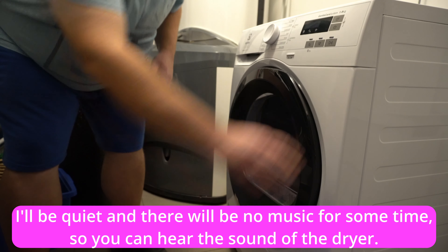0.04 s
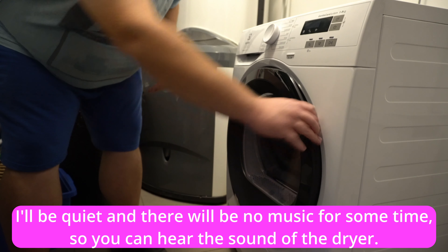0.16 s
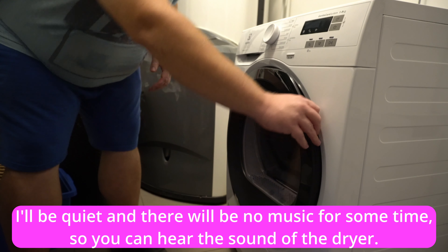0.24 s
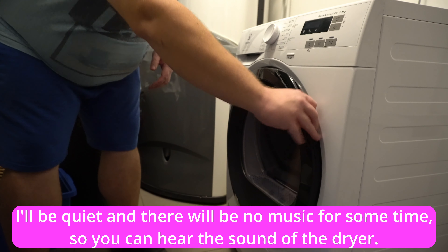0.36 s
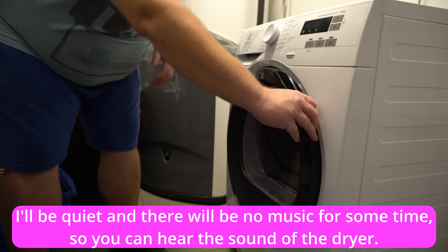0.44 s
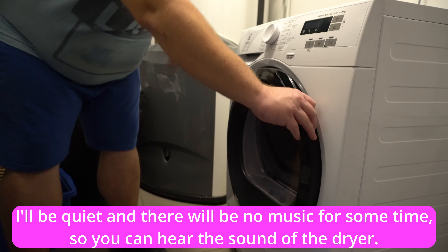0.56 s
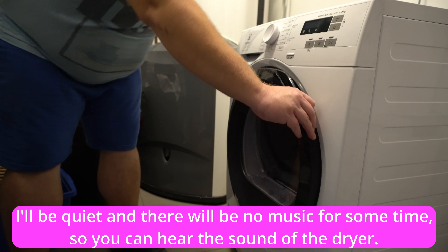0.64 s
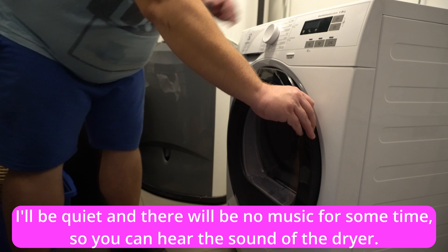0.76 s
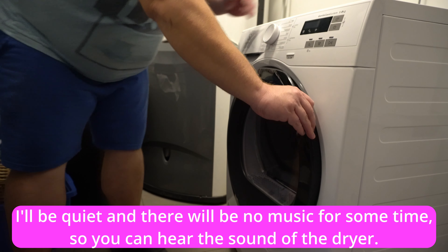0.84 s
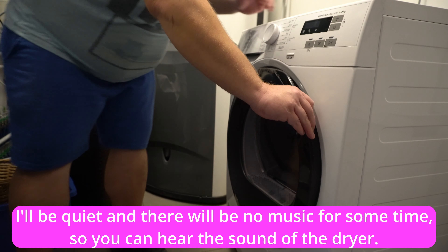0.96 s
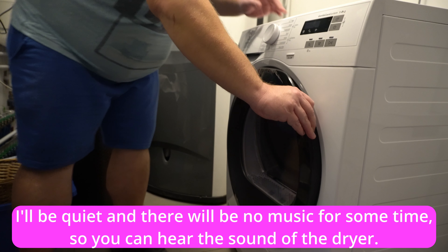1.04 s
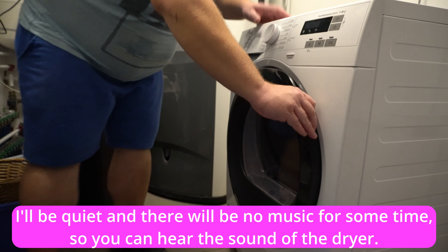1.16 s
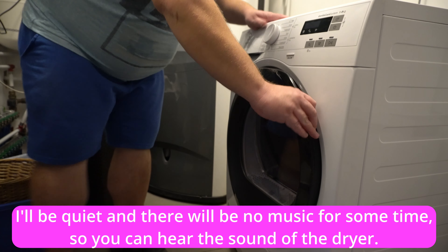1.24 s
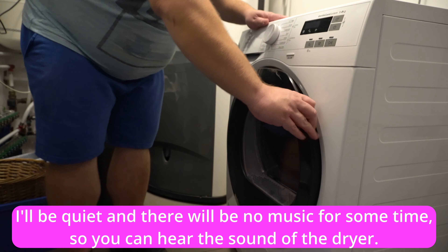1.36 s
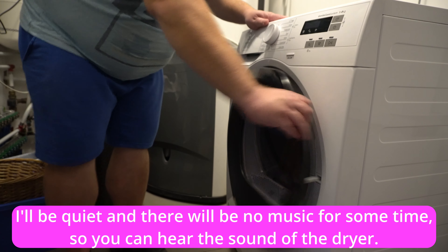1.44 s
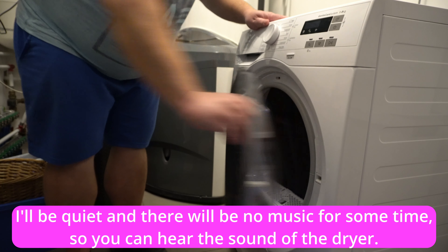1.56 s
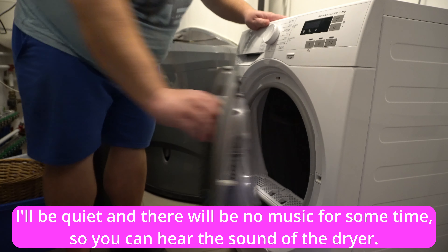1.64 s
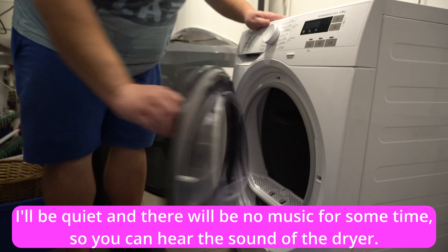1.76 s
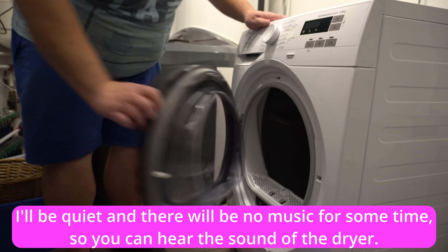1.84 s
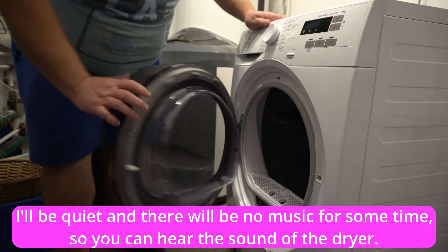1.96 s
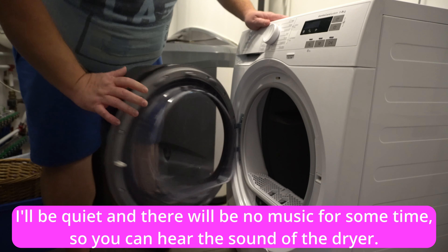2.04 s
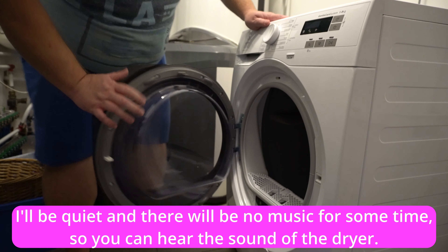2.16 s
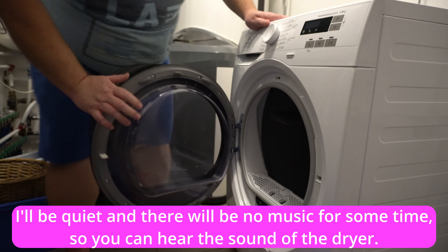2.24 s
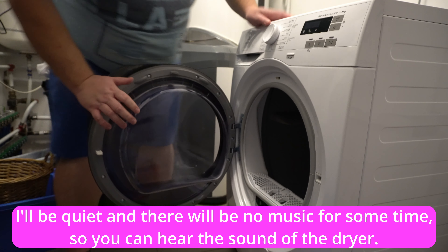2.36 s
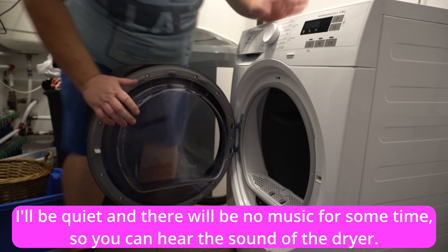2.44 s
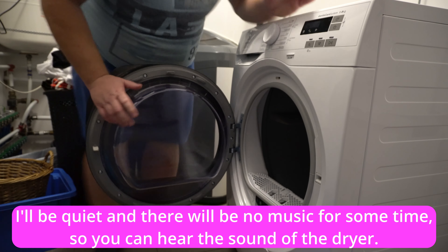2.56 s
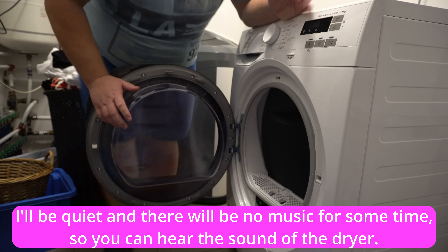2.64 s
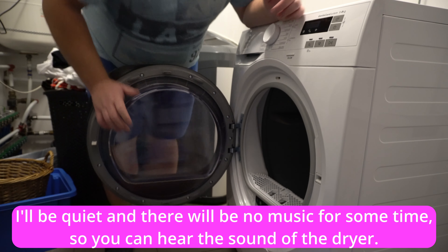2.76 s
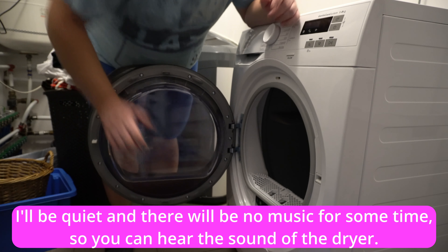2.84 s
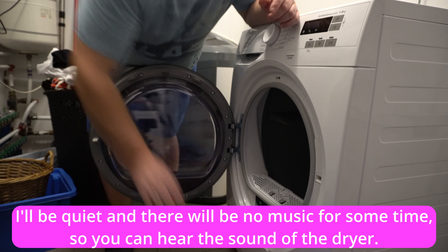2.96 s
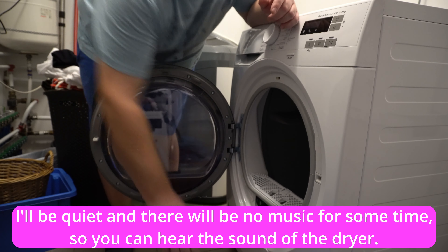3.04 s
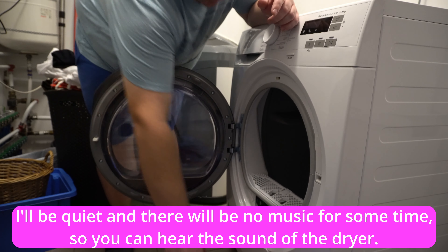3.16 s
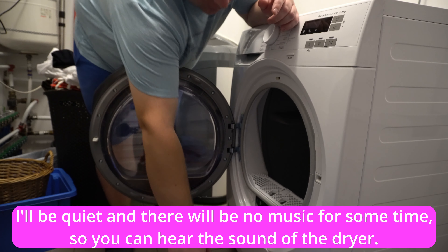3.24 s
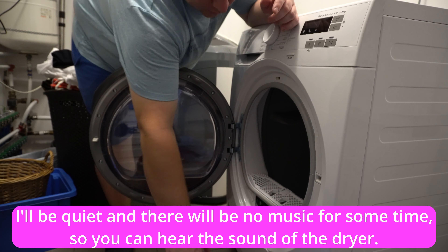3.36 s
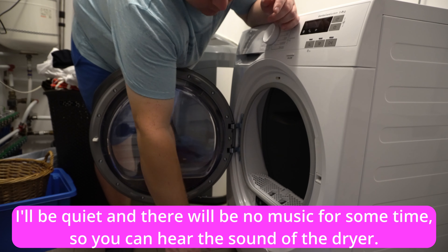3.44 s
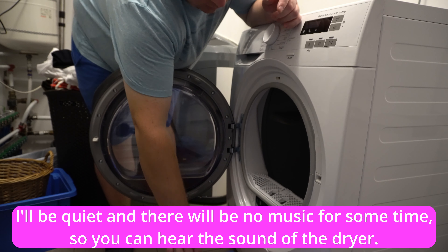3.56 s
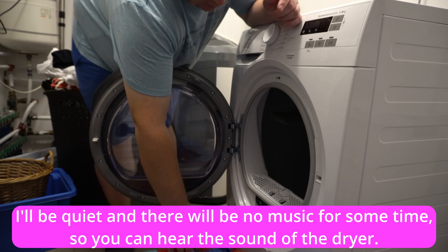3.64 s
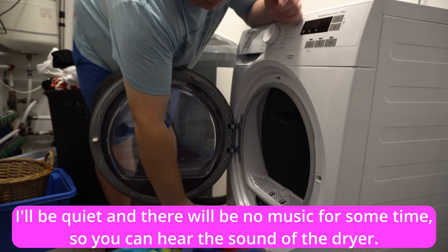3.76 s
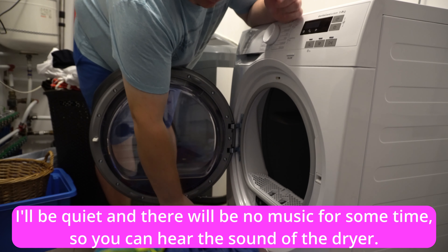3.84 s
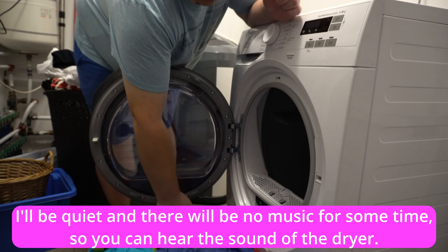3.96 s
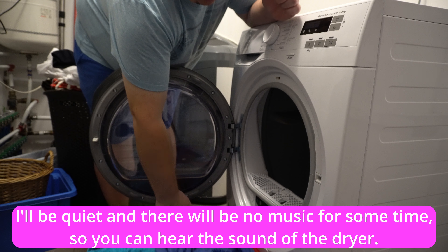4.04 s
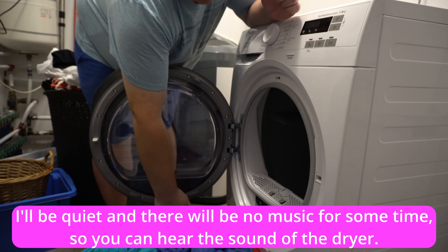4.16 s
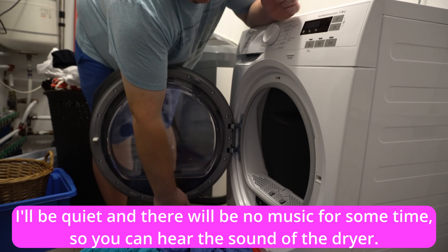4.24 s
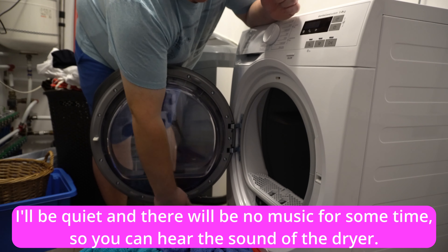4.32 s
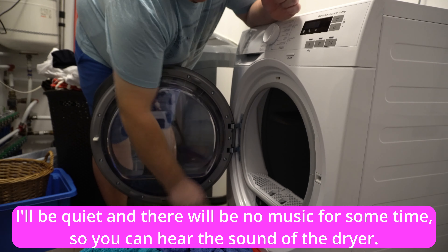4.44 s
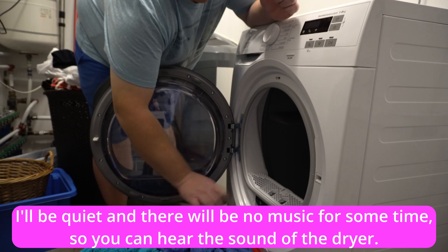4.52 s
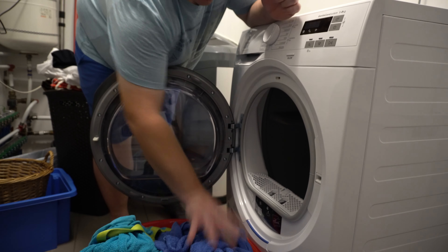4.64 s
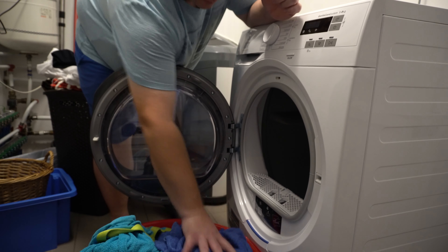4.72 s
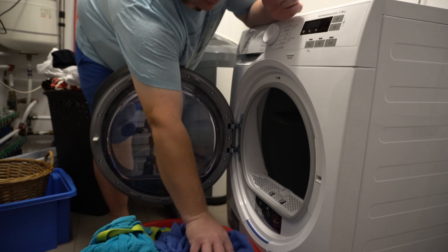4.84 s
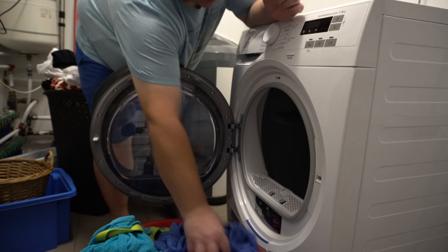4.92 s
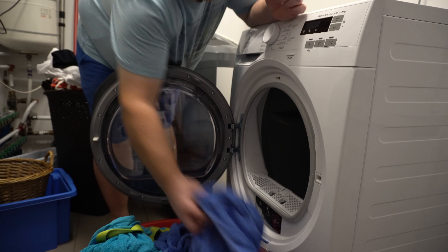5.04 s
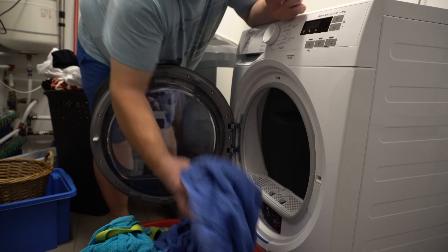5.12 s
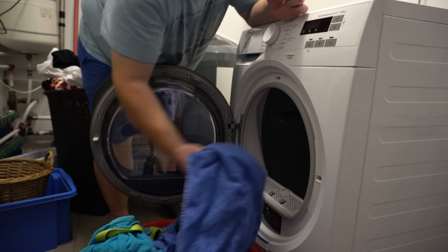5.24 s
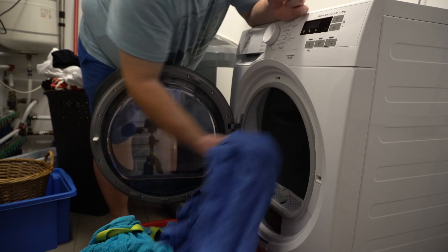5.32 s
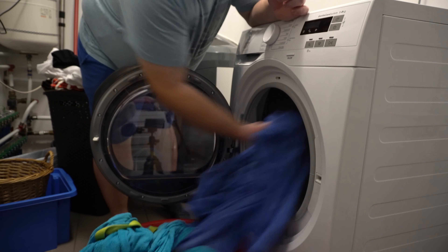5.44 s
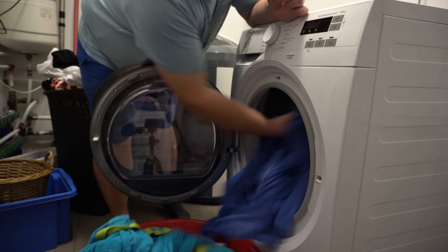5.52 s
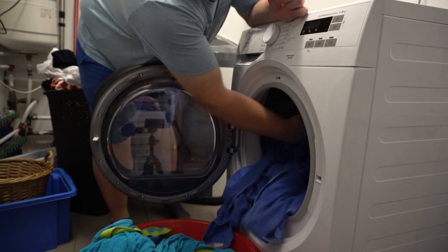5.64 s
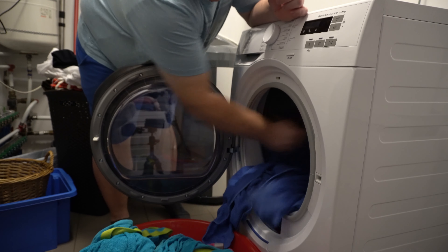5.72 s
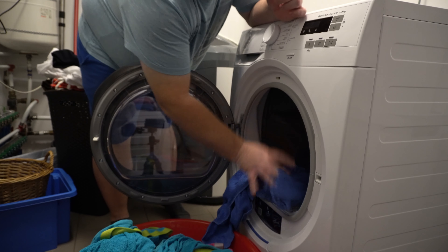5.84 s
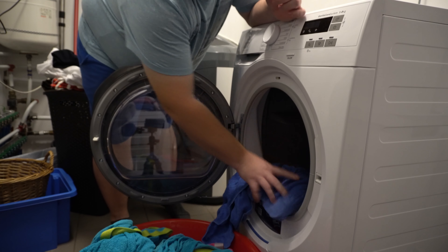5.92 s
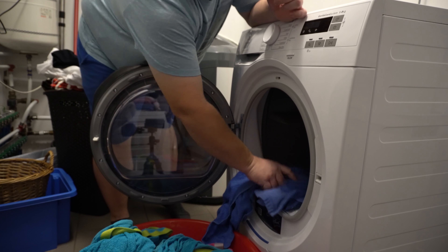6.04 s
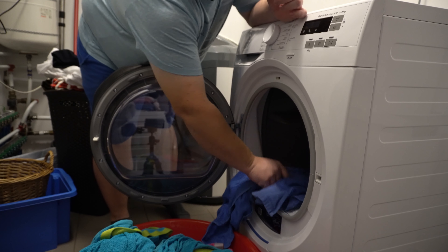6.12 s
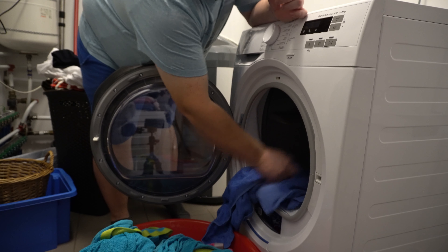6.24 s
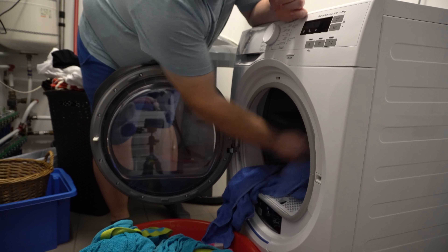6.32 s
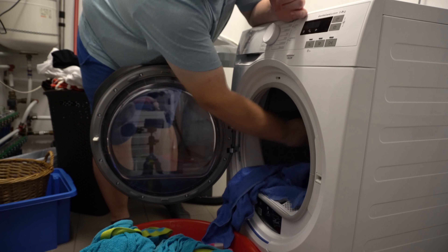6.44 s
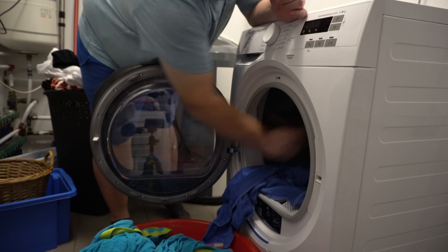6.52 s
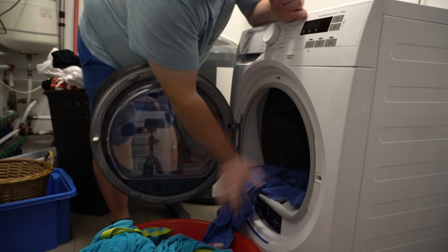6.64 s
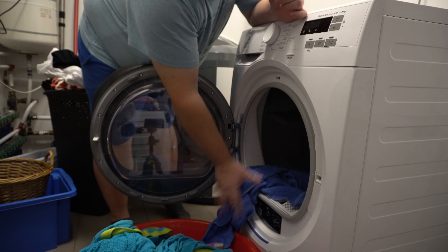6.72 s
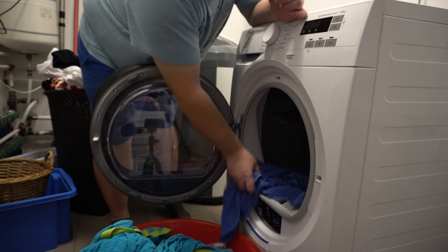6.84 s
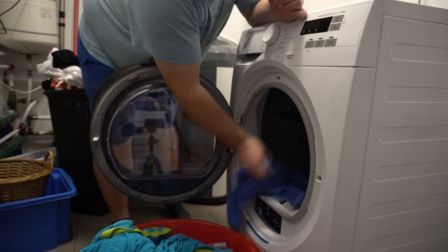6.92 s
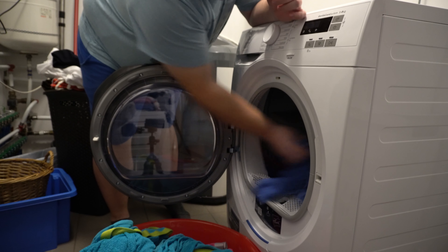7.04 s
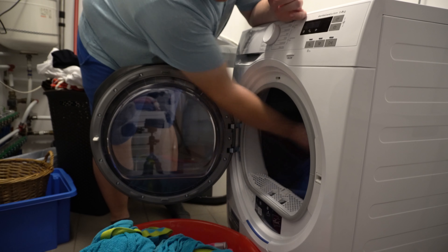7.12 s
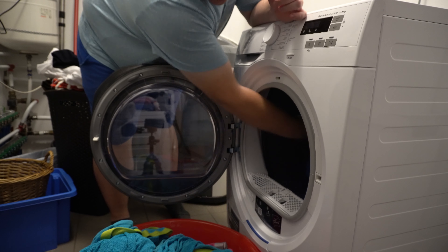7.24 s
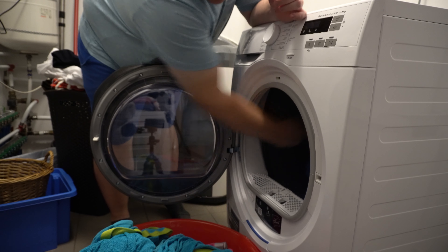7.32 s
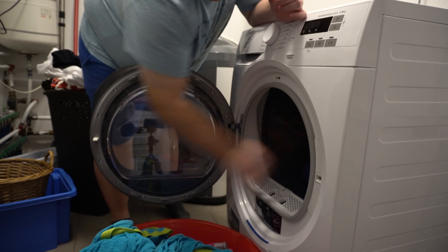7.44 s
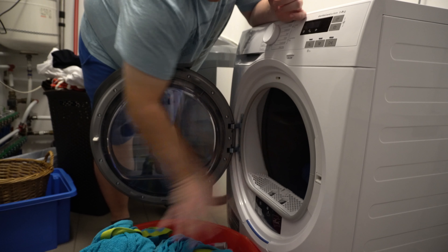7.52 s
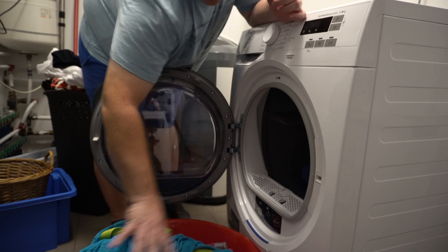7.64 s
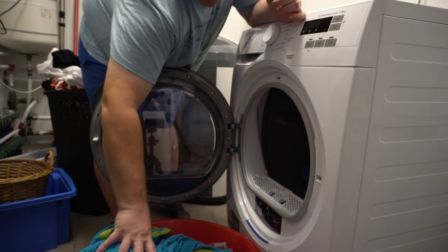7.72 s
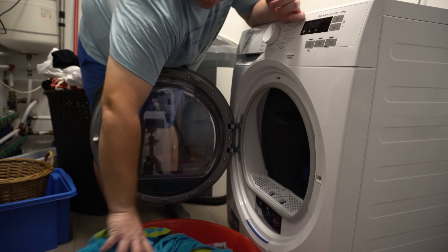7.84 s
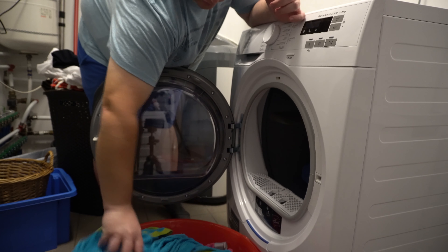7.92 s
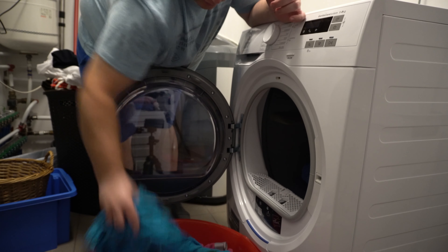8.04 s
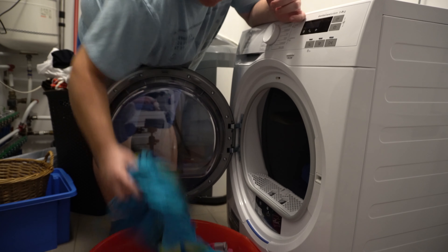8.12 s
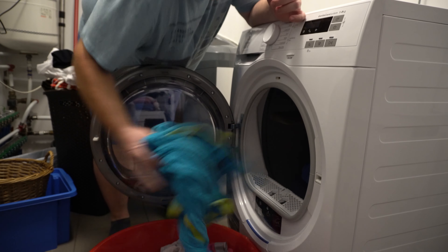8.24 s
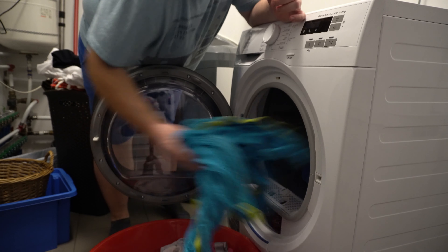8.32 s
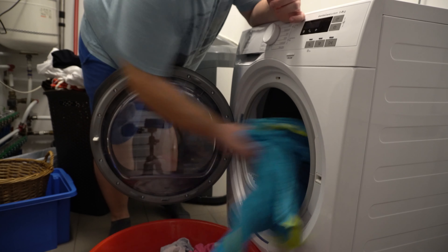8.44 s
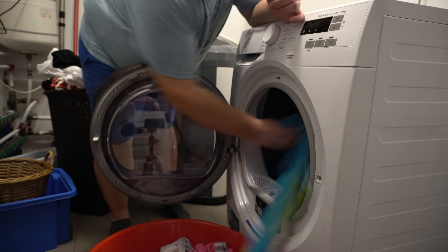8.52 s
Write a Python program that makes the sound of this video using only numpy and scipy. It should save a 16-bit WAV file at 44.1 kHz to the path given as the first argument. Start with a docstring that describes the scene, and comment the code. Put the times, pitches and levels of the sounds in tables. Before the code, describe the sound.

A constant low hum near 100 Hz, with faint rumble and soft fan rush, fills a small laundry room throughout. At 0.2-0.75 s a hand makes several light knocks on the dryer door, with a faint low boom. Fabric brushes at 1.25 s, then at 1.42-1.51 s the latch releases in a rapid cluster, peaking in a hard, loud clunk near 1.49 with a deep short boom. Light sleeve rustles and a small tick follow until 3.1. A plastic basket bumps dully, scrapes across the floor from 3.4 to 4.3, strongest around 3.7, and settles at 4.35 with a tiny stick-slip judder. Cloth slides from 4.8; muted drum thumps come at 5.5-5.8, 6.7-7.4 and, fainter, 8.15-8.55, with a slight metallic ring and soft rustling between. Close, mono, with short room reflections.

```python
"""A small laundry room: a hand grips a dryer door and pulls its latch open, a plastic basket is dragged over
the floor and set down, then damp clothes are pushed into the steel drum. Knocks are short pushes that ring
damped tones, with bursts of noise; dragging and sliding cloth are uneven noise. Behind them an appliance
hums at twice the mains frequency as a sine, and its fan fills the room with coloured noise.
Both channels carry the same sound."""
import sys
import numpy as np
from scipy import signal
from scipy.fft import rfft, irfft, next_fast_len
from scipy.io import wavfile
from scipy.ndimage import map_coordinates

SR = 44100
rng = np.random.default_rng(int(sys.argv[2]) if len(sys.argv) > 2 else 0)


def put_to_file(sound):
    """Save the sound as 16-bit audio at rate SR, in the file named by the first command-line argument."""
    columns = np.atleast_2d(sound).T  # one column per channel
    safe = np.clip(columns, -1, 1)
    whole_steps = np.round(safe * 32767)
    wavfile.write(sys.argv[1], SR, whole_steps.astype(np.int16))


N = 378378  # length of the scene in samples


def door_latch():
    """Hand and latch knock on the dryer door, and each knock rings its panel in a few fading tones."""
    # knocks: (time [s], peak of the ringing [dB], edge above it [dB],
    #          thud above it before a 2 dB cut [dB], contact length [s])
    door_knocks = [(.205, -33, -10, 4, 0.01), (.229, -36, -14, -3, 0.022), (.411, -40, -12, -13, 0.017),
                   (.439, -39.5, -13, -2, 0.032), (.593, -30, -10.5, -20, 0.0082),
                   (.749, -46, -20, -12, 0.042), (1.422, -31.5, -26, -12, .012),
                   (1.456, -26.5, -13, -11, .0071), (1.465, -24, -21, 1.5, 0.016),
                   (1.4855, -10, -3.5, -12, 0.014), (1.511, -19, -11, 1.5, 0.013),
                   (2.467, -39.5, -11, -39, 0.006)]
    # tones of the door: (frequency [Hz], level before hardness and chance [dB], time to fall 60 dB [s])
    door_modes = [(178, -6.5, 0.071), (284, 0, 0.091), (541, -2.5, 0.23), (676, -5, 0.096),
                  (804.3, 2, 0.18), (1078, -2.5, 0.05), (1250, -5, 0.067), (1620, -2, 0.036),
                  (1757, -1, 0.054), (2005, -7, 0.091)]
    dry_knocks = knocks(door_knocks, door_modes, clatter_db=-4.5, firm_db=-1.0)
    return echoes(dry_knocks, room_db=-5.5)


def basket_landing():
    """The plastic basket bumps with short, dull tones, and its rim judders as it settles."""
    # knocks: (time [s], peak of the ringing [dB], edge above it [dB],
    #          thud above it before a 2 dB cut [dB], contact length [s])
    basket_knocks = [(3.15, -35, -25, -10, 0.039), (3.219, -38, -25, 4, 0.015),
                     (3.297, -36, -25, 5.5, 0.011), (3.706, -23, -18, -16, 0.0069),
                     (3.739, -32, -14, 10, 0.016), (3.763, -29, -14, 11.5, 0.009),
                     (3.805, -32, -13, 6.5, .014), (3.972, -35, -20, 6.5, 0.011),
                     (4.351, -25, -30, -11, 0.013), (4.412, -36, -40, -6, 0.012)]
    # tones of the basket: (frequency [Hz], level before hardness and chance [dB], time to fall 60 dB [s])
    basket_modes = [(149, -12, 0.076), (280, -11, 0.067), (390, -4, 0.081), (580, -0.5, 0.16),
                    (840, -2, 0.047), (1060, -4, 0.055), (1280, -12, 0.045), (1580, -21, 0.044),
                    (2370, -26, 0.057)]
    dry_knocks = knocks(basket_knocks, basket_modes, clatter_db=-12, firm_db=2.0)
    return echoes(dry_knocks + settle(), room_db=-7)


def drum_knocks():
    """Pushing in damp clothes knocks the steel drum, which rings with one longer tone among short ones."""
    # knocks: (time [s], peak of the ringing [dB], edge above it [dB],
    #          thud above it before a 2 dB cut [dB], contact length [s])
    drum_contacts = [(5.487, -43.5, -19, 4, 0.018), (5.532, -36, -14, 2, 0.039),
                     (5.579, -31.5, -18, -3.5, 0.016), (5.619, -49, -13, 2, 0.016),
                     (5.759, -30, -16, 2.5, 0.0086), (5.784, -34.5, -12, -7.5, 0.021),
                     (6.697, -35, -30, -7, 0.0082), (6.729, -26.5, -25, -15.5, .015),
                     (6.861, -44, -28, 2, 0.019), (6.941, -48, -9, -2, 0.015),
                     (7.087, -43.5, -25, 4, 0.0095), (7.284, -40.5, -19.5, -1.5, 0.041),
                     (7.389, -42.5, -14, -2, 0.022), (8.159, -48, -28, -2, 0.016),
                     (8.431, -40, -24, 1, .015), (8.473, -39.5, -31, 2, 0.009),
                     (8.541, -42, -14, -4, 0.016), (8.557, -37, -24, -11, 0.025)]
    # tones of the drum: (frequency [Hz], level before hardness and chance [dB], time to fall 60 dB [s])
    drum_modes = [(272, -6, 0.1), (367.5, -5, 0.7), (523, 3.5, 0.11), (806.5, -5, 0.2), (970, -1, 0.087),
                  (1223, -0.5, 0.11), (1405, -11, .07), (1973, -4.5, 0.074), (2460, -15, .06),
                  (2670, -18, .06)]
    dry_knocks = knocks(drum_contacts, drum_modes, clatter_db=-5.0, firm_db=-3.0)
    return echoes(dry_knocks, room_db=-1.5)


def knocks(events, modes, clatter_db, firm_db):
    """Each contact is a short uneven push that rings the body, with an edge and a thud of its own strength."""
    # unpitched middle of a contact, before hardness tilts it: (frequency [Hz], relative level [dB])
    clatter_colour = [(250, -38), (400, 3.5), (1200, -2), (2600, -14.5), (4500, -25), (9000, -80)]
    # sharp edge of a contact: (frequency [Hz], relative level [dB])
    edge_colour = [(1350, -14), (2300, -3), (2620, -26), (3640, 2.5), (4270, -1), (5700, -1), (8390, -13.5),
                   (9240, -25), (15700, -26)]
    # heavy part of a contact: (frequency [Hz], relative level [dB])
    thud_colour = [(40, -34), (110, 2), (180, 6.5), (290, 7), (420, 0), (600, -22), (900, -38), (2000, -90)]
    dulling = 0.31  # dB per octave of hardness lost for each dB of thud: heavy contacts are soft
    out = np.zeros(N)
    t = np.arange(SR // 4) / SR
    fade = np.cos(np.pi / 2 * t / t[-1]) ** 2
    for start, db, edge_db, thud_db, length in events:
        hardness_db = firm_db - dulling * thud_db  # dB per octave

        push = np.exp(-t / length) * (1 - np.exp(-t / (0.069 * length)))
        first_blow = 0.13 * np.exp(-((t - 0.0004) / 0.00016) ** 2)
        chatter = 0.12 * push * rng.standard_normal(len(t))
        ring = ringing(modes, t, hardness_db)
        body = signal.fftconvolve(ring, chatter + first_blow)[:len(t)] * fade
        body = body / np.abs(body).max()

        tilted = [(hz, level + hardness_db * np.log2(hz / 900)) for hz, level in clatter_colour]
        clatter = amp(clatter_db) * puff(tilted, push)
        edge = amp(edge_db) * puff(edge_colour, push ** 1.56)
        thud = amp(thud_db - 2.0) * puff(thud_colour, push ** 0.96)
        add(out, start, amp(db) * (body + clatter + edge + thud))
    return out


def settle():
    """Stick-slip: a quick train of slips that slows, swells and dies, each ringing the plastic."""
    # judders of the rim: (time [s], peak [dB], length [s], slip rate at start [Hz], slip rate at end [Hz])
    judders = [(4.356, -15.5, 0.037, 286.4, 237)]
    # tones of the rim: (frequency [Hz], level before hardness and chance [dB], time to fall 60 dB [s])
    rim_modes = [(388, 4.5, 0.098), (584, -4.5, 0.12), (872, 0.5, 0.034), (1064, 0.5, 0.035),
                 (1230, -11, 0.024), (2180, -14.5, 0.015)]
    out = np.zeros(N)
    t = np.arange(SR // 5) / SR
    for start, db, length, first_hz, last_hz in judders:
        progress = np.clip(t / length, 0, 1)
        slip_hz = first_hz + (last_hz - first_hz) * progress
        turns = np.floor(np.cumsum(slip_hz) / SR)
        slips = np.diff(turns, prepend=-1)  # one click for each whole turn, and one at the start
        swell = (0.59 + 1.7 * progress) * (1 - progress ** 2)
        force = slips * swell * amp(2.0 * rng.standard_normal(len(t)))
        soft_start = 1 - np.exp(-(t / 0.00065) ** 2)  # plastic gives a little
        ring = ringing(rim_modes, t, hardness_db=1.5) * soft_start
        groan = signal.fftconvolve(force, ring)[:len(t)]
        add(out, start, amp(db) * groan / np.abs(groan).max())
    return out


def drag():
    """The basket's rim scrapes the floor as uneven noise; the judder shakes its walls and base."""
    # the drag over time: (time [s], scrape level [dB], wall level above the scrape [dB])
    drag_path = [(3.35, -55, 2), (3.39, -37.5, -2.5), (3.444, -39, 1), (3.506, -32.5, -3.5),
                 (3.688, -29, -5), (3.716, -28, -0.5), (3.76, -32.5, -1.5), (3.96, -38, 2),
                 (4.04, -39.5, -2), (4.066, -35.5, 0), (4.14, -43.5, 2), (4.212, -43, 2), (4.35, -50, 1)]
    # colour of the scrape: (frequency [Hz], relative level [dB])
    scrape_colour = [(1060, -35), (1800, -6.5), (2430, -1), (3210, -1.5), (3850, -0.5), (4140, -2),
                     (5060, -1), (5490, -2), (10200, -9), (15700, -24)]
    # resonances of the rim: (frequency [Hz], width [Hz], unused)
    rim_peaks = [(2430, 67, 0), (2880, 68, -2), (3880, 130, 0), (4360, 86, -1), (4950, 210, -1),
                 (6060, 110, -2), (8690, 120, -7), (9300, 41, -8), (10400, 37, -8)]
    # colour of the walls: (frequency [Hz], relative level [dB])
    wall_colour = [(260, -43), (450, -16), (549, 5.5), (607, -2.5), (953, 2), (1190, 3.5), (2200, -5.5),
                   (2860, -43), (4840, -120)]
    # colour of the base: (frequency [Hz], relative level [dB])
    base_colour = [(68, -35), (115, 1.5), (232, -0.5), (280, 3.5), (394, -1.5), (443, -7), (550, -1.5),
                   (720, -46), (1210, -120)]
    db, wall_db, gate = curves(drag_path)
    # the base is 7.5 dB below the scrape at its loudest, and swings less than the scrape
    base_db = db.max() - 7.5 + 0.73 * (db - db.max())
    scrape_noise = friction(scrape_colour, grain_db=1.87, peaks=rim_peaks, lift_db=3.0)
    scrape = amp(db + 1.1 * wobble(40)) * scrape_noise
    wall = amp(db + wall_db + 2.0 * wobble(40)) * friction(wall_colour, grain_db=0.6)
    base = amp(base_db + 2.9 * wobble(25)) * noise(base_colour)
    return echoes(gate * (scrape + wall + base), room_db=-8.5)


def rustle():
    """Sleeves, hand and laundry slide over each other and the machine; some landings add a short scuff."""
    # cloth and skin sliding: (start [s], length [s], hiss at start [dB], hiss at end [dB],
    #                          body above the hiss [dB], sizzle above the hiss [dB])
    slides = [(0.283, .1, -72, -72, -1, -13), (0.663, 0.22, -70, -67, 6.5, -25),
              (1.242, 0.15, -56.5, -50, -1.5, -3), (1.433, 0.053, -55, -45.5, 4, -13),
              (1.65, .2, -68, -73, 0, -4), (1.9, .13, -64, -56.5, -13, -7),
              (2.059, 0.036, -53, -55.5, -19, -5.5), (2.32, 0.054, -61, -69, -6, -8),
              (2.5, 0.27, -53.5, -50.5, -5, -5.5), (2.872, .17, -63, -54.5, 2.5, -12),
              (3.07, 0.24, -55.5, -53.5, 0, -6.5), (4.795, 0.096, -58, -56, -1, -11),
              (4.92, .28, -56, -58, 0.5, -11.5), (5.25, 0.19, -73, -66, -8, -8),
              (5.458, .14, -66, -51.5, 2.5, -12), (5.85, .28, -62, -65, -2, -9),
              (6.2, .26, -75, -63.5, -8, -7), (6.81, 0.23, -62.5, -64, -1, -12),
              (7.08, 0.022, -67, -68, -6, -5), (7.19, 0.049, -71, -67, -5, -6),
              (7.387, 0.044, -65, -61, 2, -12), (7.5, 0.15, -71, -67, -3, -28),
              (7.853, 0.33, -74, -71, -11, -8), (8.528, 0.053, -68, -46, -12, -12)]
    # a hand or cloth brushes as it lands: (time [s], hiss level before the fade in and fall [dB],
    #                                      body above the hiss [dB], sizzle above the hiss [dB])
    scuffs = [(.207, -47.5, 5.5, -6), (.415, -61, 12, -7), (.594, -52.5, 9, -22), (5.761, -47.5, 13.5, -8),
              (6.731, -64, 22, -22)]
    # colour of the cloth's hiss: (frequency [Hz], relative level [dB])
    hiss_colour = [(2200, 1), (3000, 2), (4500, 5), (6500, 2), (8000, -5.5), (10000, -47)]
    # colour of the cloth's fuller body: (frequency [Hz], relative level [dB])
    body_colour = [(150, -26), (400, -12.5), (900, 5), (2000, 4.5), (3200, -3.5), (5000, -47)]
    # colour of the cloth's high sizzle: (frequency [Hz], relative level [dB])
    sizzle_colour = [(6500, -16), (8000, 1.5), (11000, -5.5), (15700, -19)]
    slide_rise, slide_fall, scuff_fall = 600, 290, 244  # dB per second
    scuff_rise = 0.0034  # seconds
    hiss = friction(hiss_colour, grain_db=0.0)
    body = friction(body_colour, grain_db=2.0)
    sizzle = friction(sizzle_colour, grain_db=1.5)
    layers = np.array([hiss, body, sizzle])
    t = np.arange(N) / SR
    gains = np.zeros((3, N))
    for start, length, first_db, last_db, body_db, sizzle_db in slides:
        end = start + length
        db = np.interp(t, [start, end], [first_db, last_db])
        db = db - slide_rise * np.maximum(start - t, 0)
        db = db - slide_fall * np.maximum(t - end, 0)
        gains += amp(db) * amp([[0], [body_db], [sizzle_db]])
    for start, db, body_db, sizzle_db in scuffs:
        fade_in = np.clip((t - start) / scuff_rise, 0, 1)
        brush = fade_in * amp(db - scuff_fall * np.abs(t - start))
        gains += brush * amp([[0], [body_db], [sizzle_db]])
    return amp(2.5 * wobble(30)) * np.sum(gains * layers, axis=0)


def sway():
    """The cabinet sways on its feet after a push, and the steel drum rings on in one tone: soft-starting sines
    that die away."""
    # booms of the cabinet and one ring of the drum: (time [s], level before the soft start and fall [dB],
    # frequency [Hz], time to fall 60 dB [s])
    booms = [(.23, -33, 56, 0.6), (.45, -44, 56, .4), (1.469, -25, 66, .5), (5.55, -39, 60.3, 0.46),
             (5.769, -33, 66, 0.39), (5.775, -44, 367, 0.77)]
    out = np.zeros(N)
    t = np.arange(SR) / SR
    for start, db, hz, t60 in booms:
        soft_start = 1 - np.exp(-t / 0.012)
        tone = np.sin(2 * np.pi * hz * t)
        add(out, start, amp(db - 60 * t / t60) * soft_start * tone)
    return out


def appliance():
    """A transformer-like hum, a faint rumble and the fan's rush through its housing."""
    # colour of the fan's rush: (frequency [Hz], relative level [dB])
    fan_colour = [(74, -21), (125, -4), (133, -13.5), (207, -7), (225, -16.5), (286, -5.5), (412, -12.5),
                  (683, -9.5), (771, -8.5), (925, -10.5), (1110, -19), (2000, -18), (2540, -24.5),
                  (5380, -29.5), (9000, -39.5), (15700, -45.5)]
    # narrow resonances of the fan housing: (frequency [Hz], width [Hz], unused)
    fan_peaks = [(278, 8.1, 0), (868, 43, -1), (1412, 6.8, -11), (2006, 71, -10)]
    # colour of the rumble: (frequency [Hz], relative level [dB])
    rumble_colour = [(20, -32), (34, -16), (40, 5), (46, 5), (58, -10), (66, -8), (76, 6.5), (88, -3),
                     (110, -21), (190, -120)]
    hum_db, fan_db, rumble_db = -39.5, -50, -56.5  # middle rms levels, each wobbling a little
    hum_hz = 99.94 + 0.13 * wobble(0.726)
    phase = 2 * np.pi * np.cumsum(hum_hz) / SR
    hum = np.sqrt(2) * amp(hum_db + 0.15 * wobble(2.65)) * np.sin(phase)
    rush = unit(filtered(rng.standard_normal(N), peaked(fan_colour, fan_peaks, lift_db=4.5)))
    fan = amp(fan_db + 0.46 * wobble(13)) * rush
    rumble = amp(rumble_db + 1.4 * wobble(3.02)) * noise(rumble_colour)
    return hum + fan + rumble


def echoes(x, room_db):
    """x with the small room's answer: a noise tail in which each frequency dies at its own speed."""
    # how long the room rings: (frequency [Hz], time to fall 60 dB [s])
    room_decay = [(60, 0.6), (250, 0.34), (1000, 0.28), (6000, 0.34), (12000, 0.22)]
    hz, t, bands = signal.stft(rng.standard_normal(SR // 2), SR, nperseg=256)
    decay = amp(-60 * t / along(room_decay, hz)[:, None])
    tail = signal.istft(bands * decay, SR, nperseg=256)[1]
    tail = tail / np.linalg.norm(tail)
    late = np.pad(x, (130, 0))  # the answer starts about 3 ms later
    return x + amp(room_db) * signal.oaconvolve(late, tail)[:N]


def ringing(modes, t, hardness_db):
    """Damped tones at slightly new strengths; a hard blow favours the upper ones."""
    hz, db, t60 = np.transpose(modes)[:, :, None]
    db = db + hardness_db * np.log2(hz / 900) + 2 * rng.standard_normal(hz.shape)
    return np.sum(amp(db - 60 * t / t60) * np.sin(2 * np.pi * hz * t), axis=0)


def puff(spectrum, push):
    """A burst of noise shaped by a push, then coloured; its rms is that of the push."""
    burst = filtered(push * rng.standard_normal(len(push)), lambda hz: amp(along(spectrum, hz)))
    return unit(burst) * np.sqrt(np.mean(push ** 2))


def friction(spectrum, grain_db, peaks=(), lift_db=0):
    """Fibres and grit catch and slip: noise whose strength jumps every 8 samples, coloured, at rms 1."""
    grain_sizes = rng.exponential(size=N // 8 + 1).repeat(8)[:N]
    grains = rng.standard_normal(N) * amp(grain_db * grain_sizes)
    return unit(filtered(grains, peaked(spectrum, peaks, lift_db)))


def noise(spectrum, size=N):
    """Coloured noise of rms 1."""
    return unit(filtered(rng.standard_normal(size), lambda hz: amp(along(spectrum, hz))))


def peaked(spectrum, peaks, lift_db):
    """A smooth spectrum with narrow resonances standing on it, as a function of frequency."""
    def response(hz):
        bumps = sum(1 / (1 + (2 * (hz - centre) / width) ** 2) for centre, width, _ in peaks)
        return amp(along(spectrum, hz) + lift_db * bumps)
    return response


def filtered(x, response):
    """x with each frequency scaled by a response."""
    size = next_fast_len(len(x) + 4096, real=True)
    hz = np.fft.rfftfreq(size, 1 / SR)
    return irfft(rfft(x, size) * response(hz), size)[:len(x)]


def along(points, hz):
    """Reads a curve of (frequency, value) points on a log frequency axis."""
    f, v = np.transpose(points)
    return np.interp(np.log(hz + 1), np.log(f + 1), v)


def curves(rows):
    """One value per sample for each column after the time, and a gate that fades outside the table."""
    s, *columns = np.transpose(rows)
    t = np.arange(N) / SR
    gate = np.interp(t, [s[0] - 0.03, s[0], s[-1], s[-1] + 0.03], [0, 1, 1, 0])
    return [np.interp(t, s, column) for column in columns] + [gate]


def wobble(rate):
    """A smooth random curve with rate random points a second."""
    points = rng.standard_normal(int(N * rate / SR) + 4)
    return map_coordinates(points, [np.arange(N) * rate / SR])


def amp(db):
    """Gain of a level in dB."""
    return 10 ** (np.asarray(db) / 20)


def unit(x):
    """x at rms 1."""
    return x / np.sqrt(np.mean(x ** 2) + 1e-20)


def add(out, start, sound):
    """Mixes a sound into out at start seconds."""
    part = out[round(start * SR):][:len(sound)]
    part += sound[:len(part)]


def scene():
    """All the sources are summed into one signal for both channels."""
    handling = door_latch() + basket_landing() + drum_knocks()
    mono = handling + drag() + rustle() + sway() + appliance()
    return np.array([mono, mono])


def record(dry):
    """Only frequencies below the band limit are kept."""
    top_hz = 15750
    return np.array([filtered(x, lambda hz: hz < top_hz) for x in dry])


dry = scene()
out = record(dry)
put_to_file(out)
```